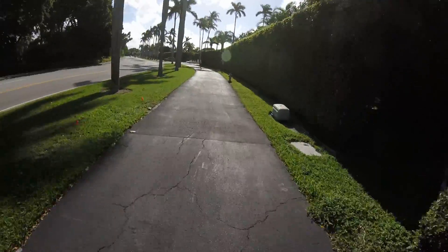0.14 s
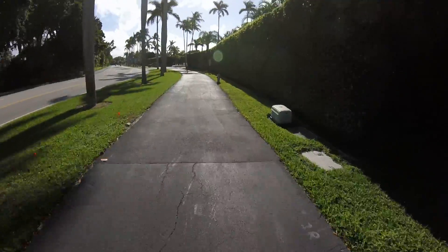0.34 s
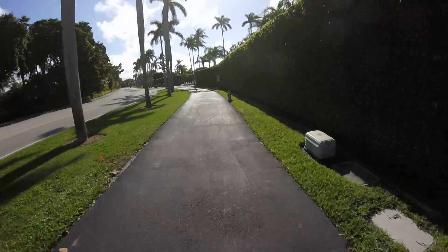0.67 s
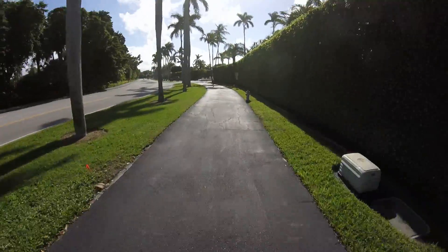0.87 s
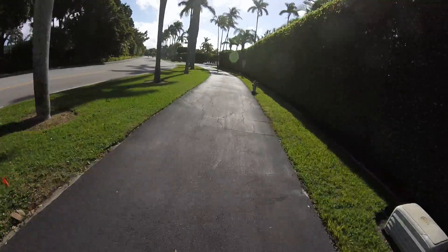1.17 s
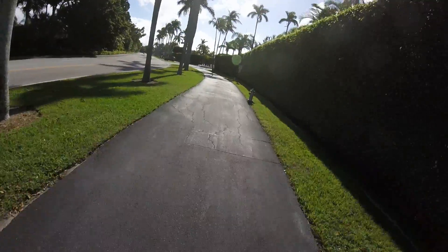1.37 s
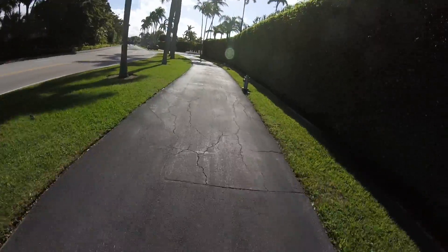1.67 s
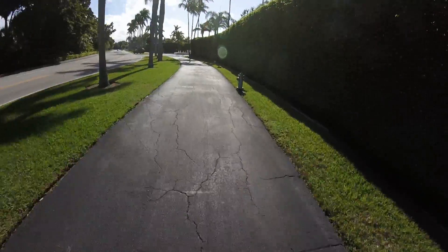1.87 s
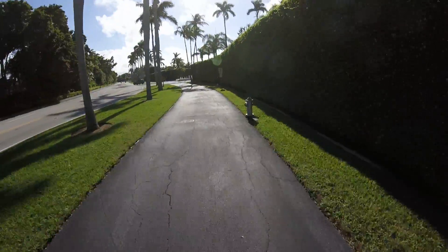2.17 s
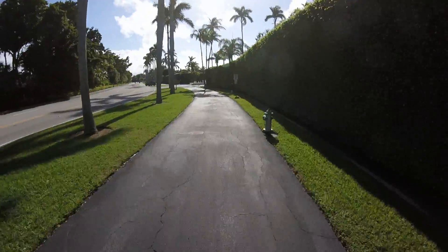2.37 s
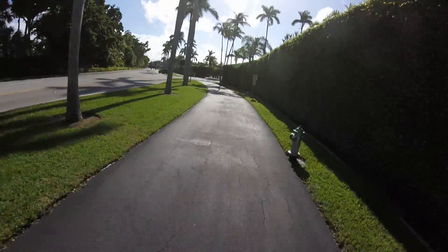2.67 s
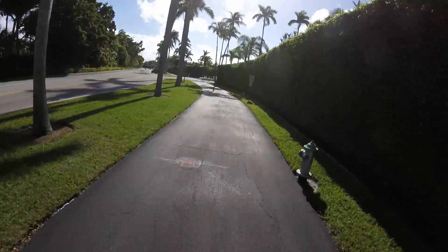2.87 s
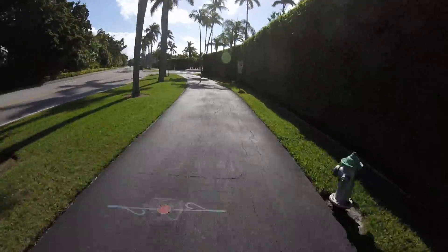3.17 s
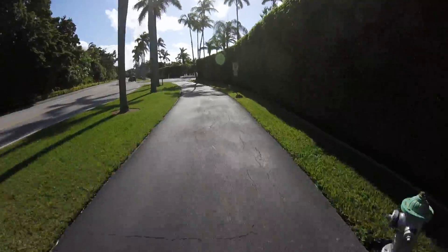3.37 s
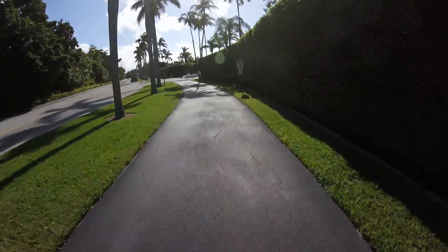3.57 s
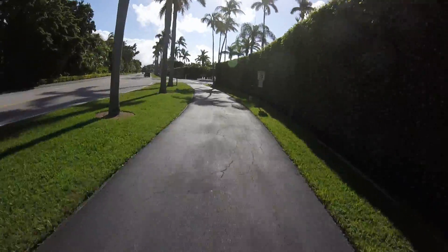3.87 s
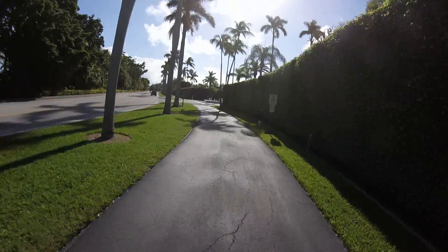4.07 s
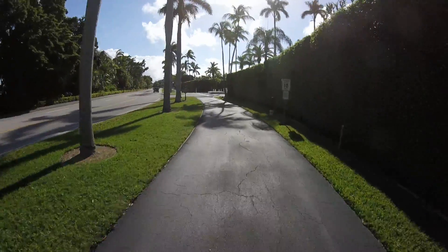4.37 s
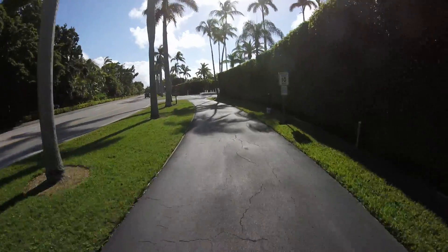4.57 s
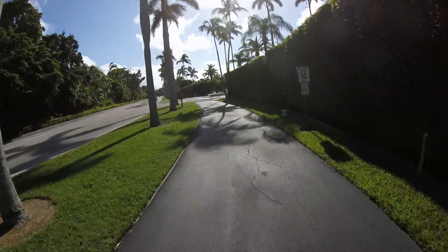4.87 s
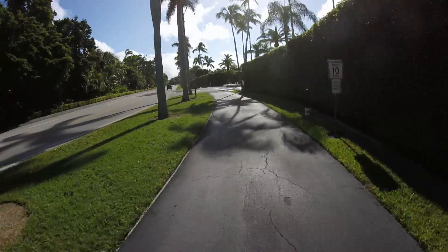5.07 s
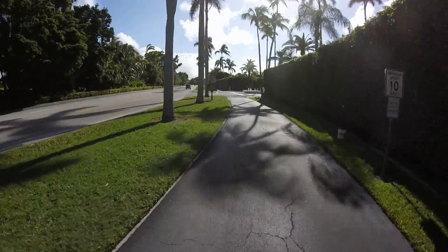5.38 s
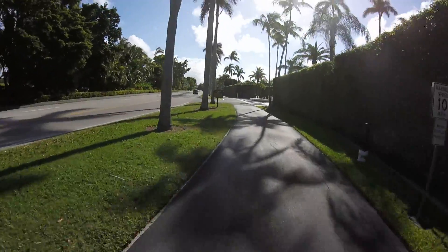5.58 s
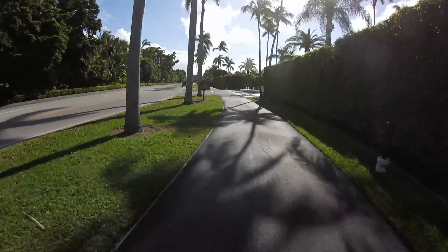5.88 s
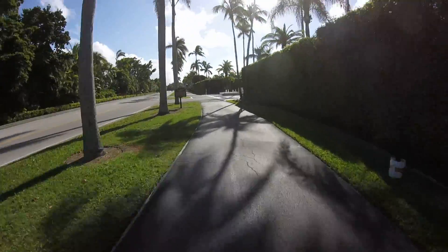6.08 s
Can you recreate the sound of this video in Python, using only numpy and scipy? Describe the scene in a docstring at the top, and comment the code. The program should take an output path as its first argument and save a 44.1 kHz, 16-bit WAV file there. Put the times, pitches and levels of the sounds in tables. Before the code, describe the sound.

A skateboard rolls steadily along cracked asphalt outdoors, low deck rumble and gritty hiss, with scattered clacks and wind buffeting the microphone strongly early on.

```python
"""Skateboard on asphalt

A skateboard rolls along an asphalt path, heard from a microphone on the rider.
Random clicks of grit and stones ring the trucks, over treble hiss and a rumbling deck.
Cracks in the path add noise-burst rattles and ticks in the trucks and thumps of the deck.
Headwind is banded noise that buffets the microphone; single eddies slap it as pressure dips."""
import sys
import numpy as np
from scipy import signal
from scipy.io import wavfile

SR = 44100
rng = np.random.default_rng(int(sys.argv[2]) if len(sys.argv) > 2 else 0)


def file_out(sig):
    """Save sig as 16-bit WAV at sys.argv[1]."""
    # one column per channel
    cols = np.atleast_2d(sig).T
    # limit, then scale
    lim = np.clip(cols, -1, 1)
    pcm = np.round(lim * 32767).astype(np.int16)
    wavfile.write(sys.argv[1], SR, pcm)


N = 275184


def from_db(db):
    """Decibels to gain."""
    return 10 ** (np.asarray(db) / 20)


def rms_one(x):
    """Scale to rms 1."""
    return x / np.sqrt(np.mean(x ** 2) + 1e-20)


def peak_one(x):
    """Scale to peak 1."""
    return x / abs(x).max()


def in_time(rows):
    """Draw each column of a table as a curve, one value per sample."""
    s, *columns = np.transpose(rows)
    return [np.interp(np.arange(N) / SR, s, column) for column in columns]


def passed(x, kind, hz):
    """Second-order low- or high-pass."""
    sos = signal.butter(2, np.clip(hz, 10, 0.45 * SR), kind, fs=SR, output="sos")
    return signal.sosfilt(sos, x)


def drift(corner_hz):
    """Slow random wander of rms 1: noise at SR / 40 through two one-pole low-passes."""
    r = np.exp(-2 * np.pi * corner_hz * 40 / SR)
    noise = rng.standard_normal(N // 40 + 2002)
    slow = signal.lfilter([1], [1, -2 * r, r * r], noise)[2000:]    # skip the filter's start
    return np.interp(np.arange(N) / 40, np.arange(len(slow)), rms_one(slow))


def grains(per_s, spread_db):
    """Random clicks of either sign, most small, a few large."""
    sizes = from_db(spread_db * np.minimum(rng.exponential(1, N), 5.0))
    signed = sizes * rng.choice([-1, 1], N)
    return signed * (rng.random(N) < per_s / SR) + 1e-18


def body(x, modes):
    """Parallel resonances of alternating sign, each applied twice for dark valleys."""
    out = np.zeros(len(x))
    for k, (hz, width_hz, level_db) in enumerate(modes):
        r = np.exp(-np.pi * width_hz * 1.5 / SR)    # each pass is wider than the pair
        b = (1 - r * r) / 2 * np.array([1, 0, -1])
        a = [1, -2 * r * np.cos(2 * np.pi * hz / SR), r * r]
        twice = signal.lfilter(b, a, signal.lfilter(b, a, x))
        out += (-1) ** k * from_db(level_db) * twice
    return out


# Headwind: t/s, buffeting level/dB, level of its upper part against the buffeting/dB
WIND_CURVE = [(0.0, -28.5, -2), (0.33, -26.5, -22), (0.4, -19, -9), (0.47, -31.5, -8), (0.55, -23.5, -8.5),
              (0.64, -14, -9), (0.72, -23, -2.5), (0.76, -15, -8), (0.82, -18.5, -2), (0.87, -25, -1.5),
              (0.95, -19, -13), (1.01, -27.5, -3), (1.12, -22.5, -4), (1.22, -25, -7), (1.39, -19.5, -6.5),
              (1.56, -30, -2.5), (1.6, -21.5, -8.5), (1.7, -28.5, -4), (1.78, -25.5, 3), (1.86, -26.5, -11),
              (1.93, -23, -0.5), (1.96, -23.5, -7), (2.07, -36, 3.5), (2.3, -34, -2.5), (2.6, -36, -0.5),
              (2.77, -29, -6.5), (2.98, -39.5, -4.5), (3.08, -21, -11), (3.18, -19, -21), (3.34, -32, -1),
              (3.67, -29, -28), (3.74, -25.5, 2.5), (3.84, -31.5, -13.5), (4.2, -33.5, -12),
              (4.3, -35, 3.5), (4.6, -30, -3), (4.8, -31, 1.5), (5.09, -31.5, -3), (5.2, -35, 6),
              (5.28, -27, -2.5), (5.42, -28.5, -11.5), (5.62, -28, 0), (5.85, -32, -1.5), (6.24, -29, -8.5)]
# Relative spectrum of wind on the microphone port: f/Hz, level per Hz/dB
BUFFET_SPECTRUM = [(18, 11), (30, 6.5), (45, 4.5), (85, 2.5), (130, -3.5), (220, -8), (350, -19.5),
                   (600, -40.5), (900, -58.5)]
WIND_SPLIT_HZ = 135


def wind():
    """Turbulence in half-octave noise bands, lumpy together and apart, split into low and upper parts."""
    buffet_db, upper_db = in_time(WIND_CURVE)
    hz, level_db = np.transpose(BUFFET_SPECTRUM)
    low_part, upper_part = 0, 0
    shared_lumps = drift(6.1)
    white = rng.standard_normal((2, N + SR))    # neighbouring bands take different noise
    edges = 16 * 2 ** np.arange(0, 6.1, 0.5)
    for k, (low, high) in enumerate(zip(edges, edges[1:])):
        sos = signal.butter(2, [low, high], "band", fs=SR, output="sos")
        band = signal.sosfilt(sos, white[k % 2])[SR:]
        centre = np.sqrt(low * high)
        band_db = np.interp(np.log(centre), np.log(hz), level_db)
        band = band * from_db(band_db + 1.3 * shared_lumps + 0.86 * drift(8.3))
        upper_share = 1 / (1 + (WIND_SPLIT_HZ / centre) ** 4)    # share of power
        low_part = low_part + np.sqrt(1 - upper_share) * band
        upper_part = upper_part + np.sqrt(upper_share) * band
    return from_db(buffet_db) * (rms_one(low_part) + from_db(upper_db) * rms_one(upper_part))


# Single eddies slapping the microphone port: t/s, peak level/dB, pitch f/Hz
EDDIES = [(0.403, -7, 63), (0.658, -9, 60), (0.768, -11.5, 130), (0.781, -6, 141), (0.805, -13, 64.6),
          (0.88, -10, 61), (0.93, -16, 110), (3.739, -22, 60), (5.01, -22.5, 120)]


def slaps():
    """Each eddy is one dip of pressure between two small rises."""
    t = np.arange(N) / SR
    out = np.zeros(N)
    for s, level_db, hz in EDDIES:
        phase_squared = (np.pi * hz * (t - s)) ** 2
        out -= from_db(level_db) * (1 - 2 * phase_squared) * np.exp(-phase_squared)
    return out


# Wheels over cracks and stones: t/s, rattle peak level/dB, decay of the rattle's noise burst/s,
# bright tick peak level/dB, deck thump peak level/dB
CRACK_HITS = [(0.022, -34, 0.0045, -47, -21), (0.134, -36.5, 0.0053, -51, -40),
              (0.208, -36, 0.0046, -58, -33), (0.3203, -36, 0.005, -46, -27),
              (0.414, -37, 0.0055, -42, -40), (0.569, -41, .004, -40, -31), (0.893, -44, 0.0035, -46, -40),
              (1.187, -35, 0.0012, -44, -35), (1.254, -41, 0.013, -48, -37), (1.29, -37, 0.0076, -45, -26),
              (1.347, -36, .012, -47, -26), (1.373, -36, 0.013, -46, -34), (1.386, -42, 0.0095, -38, -36),
              (1.411, -41, .008, -44, -41), (1.447, -38, .003, -47, -29), (1.629, -35, 0.0035, -52, -25),
              (1.7, -38, 0.0054, -59, -43), (1.7673, -36, 0.012, -50, -23),
              (2.0255, -33.5, 0.0094, -43, -24.5), (2.082, -33.5, 0.0031, -33.5, -39),
              (2.3205, -32, 0.0044, -45, -14), (2.357, -41, 0.0044, -54, -18),
              (2.5138, -34.5, 0.0033, -52, -24.5), (2.521, -33, 0.011, -40, -38),
              (2.6135, -37, .005, -44, -27), (2.625, -36, 0.018, -50, -36), (2.6515, -33, 0.0086, -39, -25),
              (2.751, -38, 0.0044, -49, -27), (2.7774, -41, 0.0044, -51, -33),
              (2.795, -41, 0.0026, -52, -39), (2.854, -36, .004, -52, -43), (2.901, -40, .003, -54, -44),
              (2.9218, -39, 0.01, -54, -42), (3.14, -36, 0.0097, -62, -39), (3.4102, -32, 0.0023, -53, -22),
              (3.925, -30.5, 0.012, -41, -45), (3.9861, -32.5, 0.016, -45, -29),
              (4.097, -38, .006, -48, -31), (4.1529, -38, 0.0065, -55, -46), (4.1777, -50, 0.004, -54, -35),
              (4.2015, -48, 0.0022, -56.5, -41), (4.562, -43, .004, -48, -38),
              (4.5946, -27, 0.003, -35, -14), (4.598, -24, 0.003, -32, -16),
              (4.6318, -27, 0.006, -32, -10.5), (4.698, -51, 0.0034, -47, -34),
              (4.778, -33, .005, -54, -35), (4.801, -41, .006, -55, -40), (4.935, -38, 0.0057, -52, -34),
              (5.171, -38.5, .004, -50, -43), (5.419, -33.5, 0.013, -44, -25),
              (5.44, -38, 0.0091, -50, -37), (5.4782, -35.5, 0.019, -52, -40),
              (5.505, -34, 0.016, -50, -45), (5.543, -38, .005, -50, -50), (5.559, -41, 0.017, -44, -37),
              (5.586, -40, 0.012, -52, -28), (5.807, -40, .005, -56, -30), (5.8648, -34, 0.0017, -60, -35),
              (6.1386, -35.5, 0.0043, -44, -44)]
# Resonances of wheels and trucks, also rung by the rolling: f/Hz, nominal width/Hz, level/dB
TRUCK_MODES = [(1040, 540, -9), (1778, 463, -5), (1975, 208, 4), (2092.4, 207, 2), (2430, 500, -9),
               (3320, 570, -11), (4570, 1470, -16.5), (6560, 1100, -20.5), (8000, 870, -23),
               (11000, 8100, -34.5), (13200, 2300, -48)]
RATTLE_FROM_HZ, RATTLE_CUT_HZ = 1900, 2500
TICK_FROM_HZ, TICK_CUT_HZ, TICK_S = 2900, 18000, 0.0025    # TICK_S: decay of the noise burst
THUMP_HZ, THUMP_S = 350, 0.0018
SAG_HZ, SAG_S, SAG_DB = 170, 0.0024, -8


def cracks():
    """Each crack is a dull dying rattle and a bright tick into the trucks, and one soft blow into the deck."""
    t = np.arange(3000) / SR
    out = np.zeros(N + len(t))
    # the deck kicks up, dips deep and rings out, and sags under the rider's weight
    swing = peak_one(t * np.exp(-t / THUMP_S) * np.sin(2 * np.pi * THUMP_HZ * t))
    sag = peak_one(t * np.exp(-t / SAG_S) * np.sin(2 * np.pi * SAG_HZ * t))
    thump = peak_one(swing - from_db(SAG_DB) * sag)
    draws = rng.standard_normal((len(CRACK_HITS), 2, len(t)))
    for (s, rattle_db, rattle_s, tick_db, thump_db), (dull, bright) in zip(CRACK_HITS, draws):
        contact = passed(dull * np.exp(-t / rattle_s), "low", RATTLE_CUT_HZ)
        contact = passed(contact, "low", RATTLE_CUT_HZ)    # twice, for a steeper slope
        rattle = body(passed(contact, "high", RATTLE_FROM_HZ), TRUCK_MODES)
        snap = passed(bright * np.exp(-t / TICK_S), "low", TICK_CUT_HZ)
        tick = body(passed(snap, "high", TICK_FROM_HZ), TRUCK_MODES)
        knock = from_db(rattle_db) * peak_one(rattle)
        knock += from_db(tick_db) * peak_one(tick)
        knock += from_db(thump_db) * thump
        out[round(s * SR):][:len(t)] += knock
    return out[:N]


# Coarseness of the asphalt, heard as the ring of the trucks: t/s, level/dB
GRIT_CURVE = [(0.0, -50), (0.27, -52), (0.5, -47), (0.7, -52), (1.15, -55.5), (1.24, -53), (1.3, -45.5),
              (1.39, -43), (1.43, -45.5), (1.5, -50), (1.72, -50.5), (1.77, -44.5), (1.84, -53.5),
              (2.07, -48), (2.2, -53.5), (2.48, -55), (2.53, -54), (2.58, -49), (2.65, -52), (2.72, -49.5),
              (3.0, -53.5), (3.14, -51.5), (3.25, -53), (3.41, -49), (3.75, -57), (3.91, -52.5),
              (3.935, -48), (4.4, -53.5), (4.62, -49), (5.0, -53), (5.4, -54.5), (5.43, -51), (5.52, -52),
              (5.6, -48), (5.66, -53.5), (5.9, -50), (6.1, -54.5), (6.24, -46)]
# Treble hiss before it follows the coarseness: t/s, lower treble level/dB, top treble level/dB
TREBLE_CURVE = [(0.0, -59.5, -74), (0.34, -59, -75), (0.53, -57.5, -72), (0.88, -58.5, -74),
                (1.16, -57.5, -75.5), (1.42, -58, -72), (1.71, -60.5, -74.5), (2.05, -58, -72),
                (2.38, -59.5, -71), (2.69, -57.5, -71.5), (2.88, -60, -73), (3.37, -57.5, -73),
                (3.5, -62, -72), (3.75, -58, -74), (4.04, -59, -73), (4.23, -61, -74), (4.47, -59, -75),
                (4.77, -58.5, -71), (4.94, -58, -76), (5.23, -59.5, -74), (5.58, -59, -74.5),
                (6.2, -61, -72.5)]
# Deck rumble before it follows the coarseness: t/s, level/dB
RUMBLE_CURVE = [(0, -35), (0.33, -37.5), (0.75, -28), (0.97, -33), (1.27, -33), (1.4, -30.5), (1.55, -37),
                (1.77, -33), (2.0, -32.5), (2.45, -37), (3.0, -35.5), (3.4, -34.5), (4.4, -38),
                (4.8, -31.5), (5.5, -36.5), (6.24, -35.5)]
# Roar of the deck's top mode: t/s, level/dB
ROAR_CURVE = [(0.0, -58), (0.01, -49), (0.54, -48), (0.61, -40), (0.97, -56), (1.18, -45.5), (1.25, -47),
              (1.32, -43.5), (1.41, -35.5), (1.46, -42), (1.53, -51), (1.74, -44), (2.12, -44.5),
              (2.17, -51.5), (2.35, -44.5), (2.47, -54.5), (2.68, -44.5), (2.94, -55.5), (3.08, -49.5),
              (4.08, -48.5), (4.45, -58), (4.59, -43.5), (5.13, -50.5), (6.24, -47.5)]
# Resonances of the wooden deck: f/Hz, nominal width/Hz, level/dB
DECK_MODES = [(240.7, 148, 1.5), (315, 211, -1), (474.4, 142, -1.5), (665, 243, -12.5)]
GRIT_PER_S, GRIT_SPREAD_DB, GRIT_FROM_HZ, GRIT_CUT_HZ = 1500, 0.5, 1630, 2900
STONES_PER_S, STONE_SPREAD_DB, STONES_DB = 160, 2.5, -6    # STONES_DB: against the grit
HISS_PER_S, HISS_SPREAD_DB, HISS_FROM_HZ, HISS_LOW_HZ = 14000, 2, 5200, 1230
TOP_FROM_HZ = 9000
BUMPS_PER_S, BUMP_SPREAD_DB, DECK_CUT_HZ = 1500, 2.5, 813
RING_SPLIT_HZ, RING_SWAY_DB, RING_SWAY_HZ = 2080, 1.5, 20
LOW_HISS_DB = -56.5    # at mean coarseness
# shares of the coarseness swing (in dB) that each layer follows
TREBLE_FOLLOWS, TOP_FOLLOWS, LOW_HISS_FOLLOWS, RUMBLE_FOLLOWS = 0.3, 0.45, 0.29, 0.15


def rolling():
    """Grit and stones set the trucks chattering over a fine even hiss; bumps shake the deck."""
    grit_db, = in_time(GRIT_CURVE)
    treble_db, top_db = in_time(TREBLE_CURVE)
    rumble_db, = in_time(RUMBLE_CURVE)
    roar_db, = in_time(ROAR_CURVE)
    coarse_db = grit_db - grit_db.mean()
    patch = drift(6.6)    # coarseness under the wheels, shared by grit, hiss and bumps

    grit = grains(GRIT_PER_S, GRIT_SPREAD_DB) * from_db(0.6 * patch + 1.3 * drift(37))
    stones = grains(STONES_PER_S, STONE_SPREAD_DB)    # larger stones stand out one by one
    contacts = rms_one(grit) + from_db(STONES_DB) * rms_one(stones)
    contacts = passed(contacts, "low", GRIT_CUT_HZ)    # the soft tyre dulls each contact
    contacts = passed(contacts, "high", GRIT_FROM_HZ)

    hiss = grains(HISS_PER_S, HISS_SPREAD_DB) * from_db(0.31 * patch + 0.17 * drift(40))
    treble = body(passed(hiss, "high", HISS_FROM_HZ), TRUCK_MODES)
    top_split = signal.butter(3, TOP_FROM_HZ, fs=SR, output="sos")
    lower_treble = signal.sosfiltfilt(top_split, treble)
    top = treble - lower_treble
    low_hiss = body(passed(hiss, "low", HISS_LOW_HZ), TRUCK_MODES)

    bumps = grains(BUMPS_PER_S, BUMP_SPREAD_DB) * from_db(0.93 * patch + 0.81 * drift(15.0))
    for _ in range(2):    # the tyres soak up the sharp edges
        bumps = passed(bumps, "low", DECK_CUT_HZ)
    rumble, roar = body(bumps, DECK_MODES[:-1]), body(bumps, DECK_MODES[-1:])

    # the load shifts between the lower and upper ring
    sway = from_db(RING_SWAY_DB * drift(RING_SWAY_HZ))
    lower_modes = [mode for mode in TRUCK_MODES if mode[0] <= RING_SPLIT_HZ]
    upper_modes = [mode for mode in TRUCK_MODES if mode[0] > RING_SPLIT_HZ]
    ring = body(contacts / sway, lower_modes) - body(contacts * sway, upper_modes)

    return (from_db(grit_db) * rms_one(ring)
            + from_db(treble_db + TREBLE_FOLLOWS * coarse_db) * rms_one(lower_treble)
            + from_db(top_db + TOP_FOLLOWS * coarse_db) * rms_one(top)
            + from_db(LOW_HISS_DB + LOW_HISS_FOLLOWS * coarse_db) * rms_one(low_hiss)
            + from_db(rumble_db + RUMBLE_FOLLOWS * coarse_db) * rms_one(rumble)
            - from_db(roar_db) * rms_one(roar))


def scene():
    """Wind and board at one microphone."""
    return (wind() + slaps() + cracks() + rolling())[None, :]


MIC_BASS_HZ, CUTOFF_HZ = 26.6, 15250


def record(dry):
    """The microphone loses the deepest bass; the sound opens without a click; the top is cut."""
    opened = dry * np.minimum(np.arange(N) / 90, 1)    # fade-in over 90 samples
    heard = passed(opened, "high", MIC_BASS_HZ)
    top_cut = signal.cheby2(20, 60, CUTOFF_HZ, fs=SR, output="sos")    # 60 dB down at the cutoff
    return signal.sosfilt(top_cut, heard)


dry = scene()
out = record(dry)
file_out(out)
```